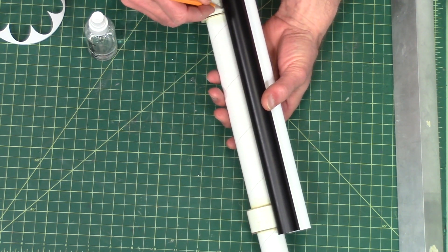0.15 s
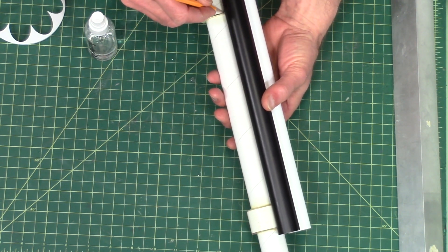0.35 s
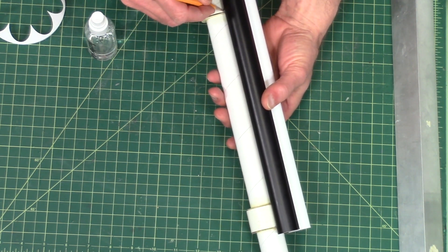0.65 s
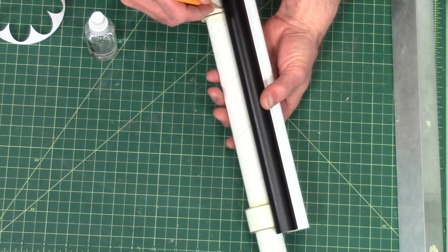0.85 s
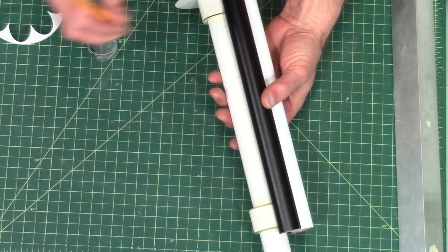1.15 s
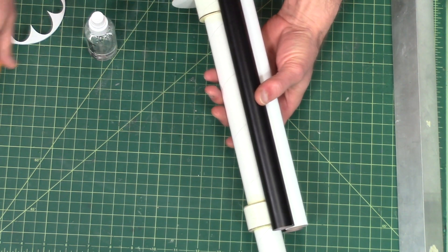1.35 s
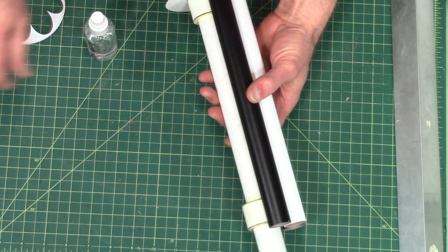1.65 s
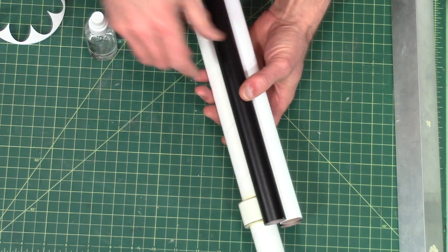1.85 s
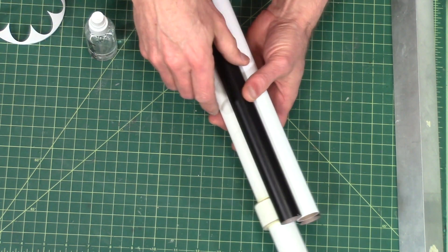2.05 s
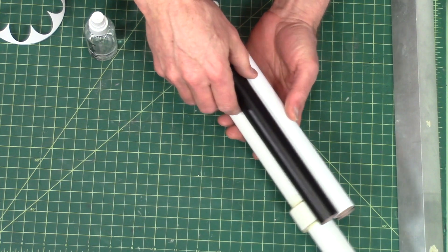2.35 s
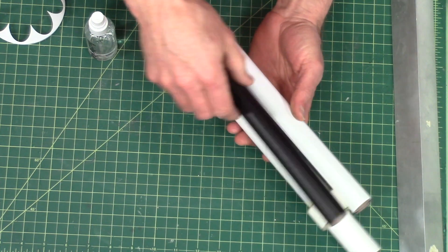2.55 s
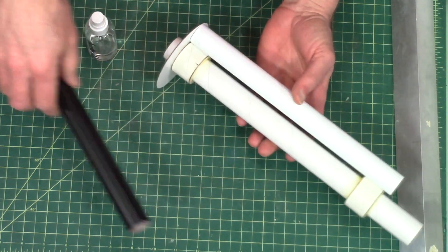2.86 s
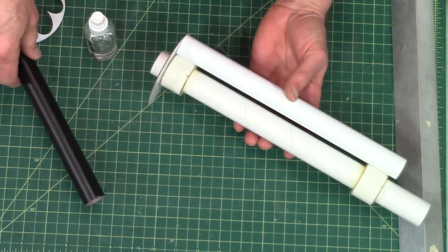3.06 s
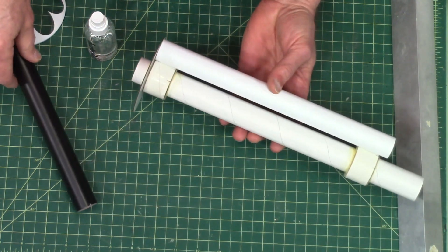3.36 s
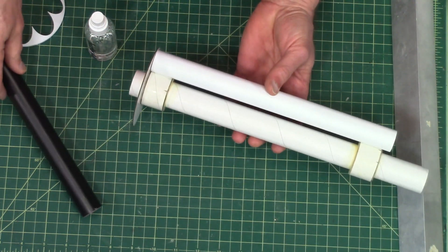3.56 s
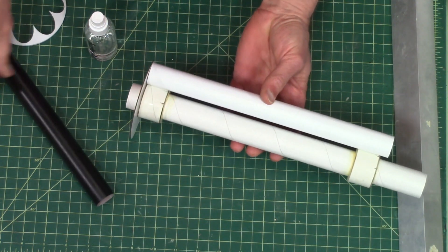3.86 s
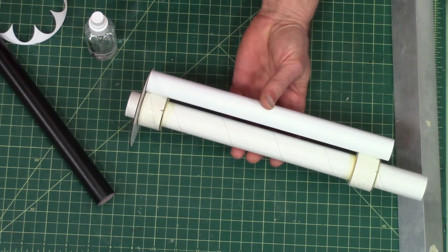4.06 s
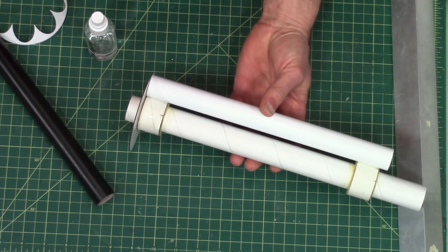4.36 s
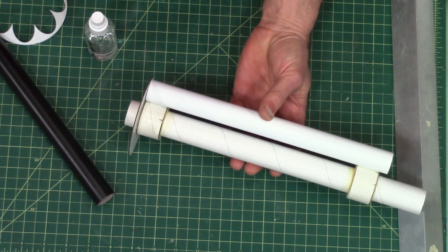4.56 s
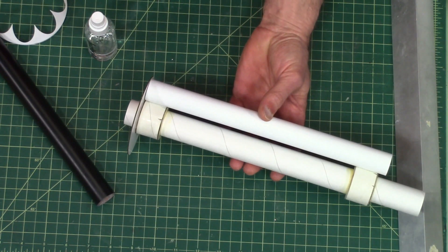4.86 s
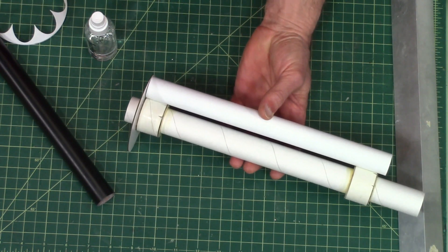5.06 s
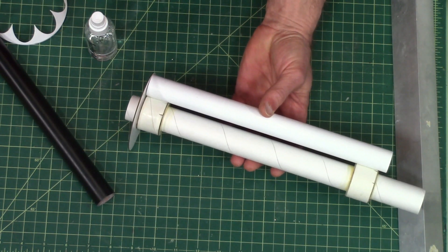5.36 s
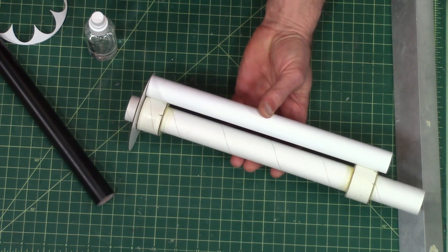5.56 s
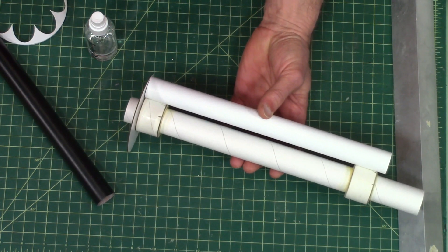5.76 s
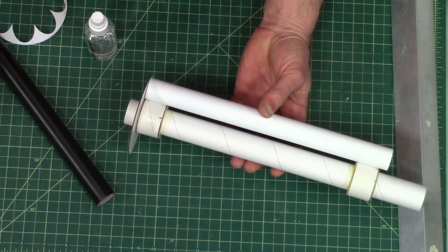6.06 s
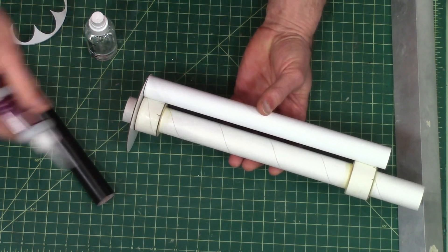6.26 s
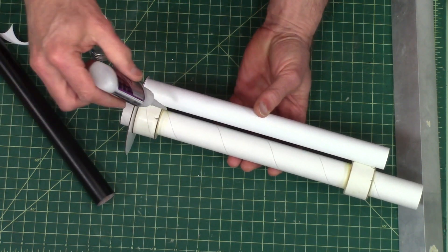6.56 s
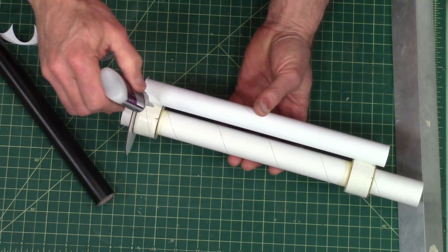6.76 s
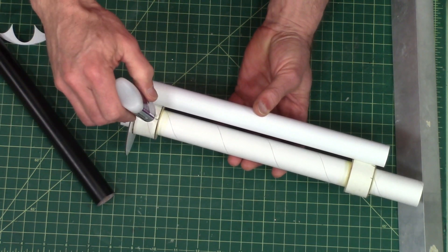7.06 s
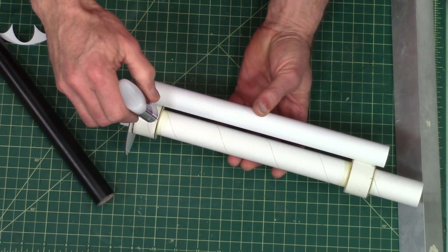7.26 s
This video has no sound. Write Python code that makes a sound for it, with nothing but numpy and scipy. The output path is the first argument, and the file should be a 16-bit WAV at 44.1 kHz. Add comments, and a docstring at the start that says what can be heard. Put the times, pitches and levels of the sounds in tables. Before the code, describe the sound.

A low building rumble and soft microphone hiss run throughout in a small room. During the first second a pencil makes several faint, short scratches on cardboard. At about 1.5 seconds it is put down with a double click, the second brighter. Fingers brush the card at 2 seconds. From 2.4 to 2.7 seconds a loose cardboard tube taps and thumps onto a cutting mat, while a distant engine hum swells, then slowly sinks and fades. The tube is nudged at 3.2 and 3.8 seconds, with light clicks and brief sliding. Faint finger rubs follow. At about 5.1 and 5.2 seconds glued cardboard tubes knock twice on the bench, hollow and slightly ringing, the loudest sounds here. More soft rubbing comes near 5.8 seconds, and a glue bottle makes two light, crunchy taps at about 6.2 and 6.6 seconds.

```python
"""A workbench in a small room, where cardboard tubes are handled over a cutting mat.
A pencil marks a tube and is put down; fingers rub the card; a loose black tube is set down, nudged and
rolls a little; the glued white tubes knock twice on the bench and a glue bottle is brought up to them.
Impact and friction excite the objects and the bench beneath them, and the room reverberates.
Under it all lie the rumble of the building, microphone hiss and the hum of a far engine."""
import sys
import numpy as np
from scipy import signal
from scipy.fft import rfft, irfft, next_fast_len
from scipy.io import wavfile
from scipy.ndimage import uniform_filter1d

SR = 44100
rng = np.random.default_rng(int(sys.argv[2]) if len(sys.argv) > 2 else 0)


def wav_record(signal):
    """Record a signal, one row per channel, as 16-bit PCM in the file named by sys.argv[1]."""
    frames = np.transpose(np.atleast_2d(signal))
    bounded = np.clip(frames, -1, 1)
    # unit amplitude maps onto the largest positive 16-bit level
    quanta = np.round(bounded * 32767).astype(np.int16)
    wavfile.write(sys.argv[1], SR, quanta)


N = 326340
RING = 16384  # samples in which an object rings out
# modes of the glued white tubes: (frequency [Hz], energy re the click [dB], T60 [s])
WHITE_TUBE_MODES = [(686, -10, .22), (783, -13, .1), (1338, -16, .14), (1460, -6, .04), (1576, 0, .07),
                    (1601, -6, .17), (1665, -5, .11), (1705, -13, .12), (1807, -20, .1)]


def undb(db):
    """Decibels to amplitude ratio."""
    return 10 ** (np.asarray(db) / 20)


def unit(x):
    """Normalisation to an energy of one."""
    return x / np.sqrt(np.sum(x ** 2))


def along(points, size):
    """Interpolation of a (frequency [Hz], value) table at FFT bins, on a logarithmic axis."""
    hz, value = np.transpose(points)
    return np.interp(np.log(np.arange(size // 2 + 1) * SR / size + 1), np.log(hz), value)


def tint(x, points):
    """Minimum-phase filter with a (frequency [Hz], gain [dB]) response, built from its cepstrum."""
    size = 2 * next_fast_len(len(x) // 2 + RING // 2)
    cepstrum = irfft(np.log(undb(along(points, size))))
    cepstrum[1:size // 2] *= 2
    cepstrum[size // 2 + 1:] = 0
    return irfft(rfft(x, size) * np.exp(rfft(cepstrum)))[:len(x)]


def add(track, start_s, x):
    """Superposition of x on the track."""
    i = max(int(start_s * SR), 0)
    track[i:i + len(x)] += x[:N - i]


def walk(rate_hz):
    """Slow random modulation with a spread near one."""
    step = int(SR / rate_hz)
    return uniform_filter1d(np.repeat(rng.standard_normal(N // step + 1), step), step)[:N]


def pair_noise(coherence, size):
    """Partial coherence: white noise at two microphones is a common part plus or minus a side part."""
    mid, side = rfft(rng.standard_normal((2, size)))
    alike = np.clip(along(coherence, size), 0, 1)
    mid, side = mid * np.sqrt((1 + alike) / 2), side * np.sqrt((1 - alike) / 2)
    return irfft(np.array([mid + side, mid - side]), size)


def background(sway_db):
    """Spectrally shaped noise: the gently swaying rumble of the building and even microphone hiss."""
    # likeness of the noise at the two microphones: (frequency [Hz], coherence [0-1])
    coherence = [(130, 0.94), (300, 0.24), (700, 0.3), (1200, 0.11)]
    # noise spectra: (frequency [Hz], density [dB per Hz])
    rumble_spectrum = [(15, -84), (28, -73), (36, -70), (48, -82), (68, -76.5), (115, -74), (160, -82),
                       (240, -91.5), (500, -93), (1000, -107), (3000, -130)]
    hiss_spectrum = [(500, -112), (1200, -109), (1600, -102), (2000, -99), (2400, -103.5), (3100, -108),
                     (4200, -105.3), (6200, -102.3), (9000, -105), (12000, -110.5), (15500, -114.5)]
    rumble, hiss = (irfft(rfft(pair_noise(coherence, N)) * undb(along(spectrum, N)), N)
                    for spectrum in (rumble_spectrum, hiss_spectrum))
    return (rumble * undb(sway_db * walk(3.2)) + hiss) * np.sqrt(SR / 2)


def far_engine(waver_db, drift):
    """Wall transmission passes only an engine's lowest note; it swells, then fades and sinks to idle."""
    peak_s, peak_db, rise_db_per_s, fade_db_per_s = 2.8, -48, 37, 4
    high_hz, idle_hz, sink_s = 109, 95.2, 0.93
    t = np.arange(N) / SR
    before, after = np.maximum(peak_s - t, 0), np.maximum(t - peak_s, 0)
    hz = idle_hz + (high_hz - idle_hz) * np.exp(-after / sink_s)
    db = peak_db - rise_db_per_s * before - fade_db_per_s * after
    phase = 2 * np.pi * np.cumsum(hz * (1 + drift * walk(9))) / SR
    return np.sqrt(2) * np.sin(phase) * undb(db + waver_db * walk(7))


def body(click, modes):
    """Impulse response of an object, in two parts: the contact click and a sum of damped modes."""
    t = np.arange(RING) / SR
    ring = sum(undb(db) * unit(np.sin(2 * np.pi * hz * t) * np.exp(-np.log(1000) * t / t60))
               for hz, db, t60 in modes)
    return unit(tint(1. * (t == 0), click)), ring


def bench_thumps():
    """Contact stiffness colours the bench's thump: deep through the soft mat, higher under stiff tubes."""
    # spectrum of the struck bench: (frequency [Hz], level [dB])
    thud = [(30, -45), (60, -23), (120, -16.5), (190, 5), (400, 7), (560, -14), (720, -3.5), (1050, -15.5),
            (2000, -47), (6000, -40)]
    # bench modes: (frequency [Hz], energy re the thud [dB], T60 [s])
    modes = [(204, -18, .8), (224, -20.5, .7), (310, -27, .7), (366, -17, .3), (419, -16, .25),
             (466, -10, .22), (582, -17, .18), (640, -14, .18)]
    # colour of each contact: (frequency [Hz], gain [dB])
    soft_contact = [(160, -3), (235, 4.5), (320, -10), (430, 1), (750, 0)]
    stiff_contact = [(160, 1), (240, -4), (320, -7), (450, 1), (720, 4), (1100, -1.5)]
    thump = unit(sum(body(thud, modes)))
    return tint(thump, soft_contact), tint(thump, stiff_contact)


def excite(force, response, treble_db, ring_db):
    """Forced vibration by convolution: harder contact lifts the treble, a grip weakens the modes."""
    click, ring = response
    vibration = signal.fftconvolve(force, click + undb(ring_db) * ring)[:RING]
    return unit(tint(vibration, [(1900, 0), (8000, treble_db)]))


def rubs(table, response, bench, slips_per_s, grain_db, thump_db):
    """Stick-slip friction: a swell of small, uneven slips rings the object and rumbles in the bench."""
    lightness = 0.88  # a light, bright rub shakes the bench less: dB lost per dB of treble
    out, t = np.zeros(N), np.arange(RING) / SR
    for start_s, length_s, db, treble_db, ring_db in table:
        slips = (rng.random(RING) < slips_per_s / SR) * rng.standard_normal(RING)
        slips *= undb(grain_db * rng.exponential(size=RING))
        force = slips * np.sin(np.pi * np.minimum(t / length_s, 1) ** 0.45)
        rumble = undb(thump_db - lightness * treble_db) * unit(signal.fftconvolve(force, bench)[:RING])
        scrape = excite(force, response, treble_db, ring_db)
        add(out, start_s, undb(db) * (scrape + rumble) * np.sqrt(length_s * SR))
    return out


def pencil_strokes(bench):
    """Friction of lead on cardboard: dense, fine slips excite heavily damped high modes."""
    # strokes: (time [s], duration [s], level [dB])
    strokes = [(0.097, 0.096, -59), (0.244, 0.14, -61.5), (0.43, 0.017, -52.5), (0.533, .07, -64.5),
               (0.657, 0.07, -63), (0.794, 0.028, -62), (0.851, 0.08, -60.5), (0.933, 0.02, -53)]
    # spectrum of one slip: (frequency [Hz], level [dB])
    scratch = [(300, -26), (2800, -6), (4100, -31), (5000, 0), (6200, 0.5), (9000, 6.5), (12000, -5),
               (15000, -32)]
    # modes of the lead: (frequency [Hz], energy re the slip [dB], T60 [s])
    modes = [(3750, -6, .015), (4150, -7, .012), (9000, -10, .01)]
    treble_db, ring_db = 1, -8  # all strokes are pressed alike
    strokes = [(*stroke, treble_db, ring_db) for stroke in strokes]
    return rubs(strokes, body(scratch, modes), bench, slips_per_s=6000, grain_db=0.5, thump_db=-27)


def blows(table, response, bench, crunch, crunch_s, direct_db, rebound=None):
    """Impact rings the object and thumps the bench; returns the feeds to the room and the direct path.
    A long, loose object lands one end first, then rebounds: (lag [s], level, treble, direct path [dB])."""
    out, t = np.zeros((2, N)), np.arange(RING) / SR
    contacts = [(0, 0, 0, 0)] + ([rebound] if rebound else [])
    for start_s, db, thump_db, treble_db, ring_db in table:
        for lag_s, more_db, more_treble_db, more_direct_db in contacts:
            # the rough surfaces give way in tiny slips just after they meet
            slips = unit(rng.standard_normal(RING) ** 3 * np.exp(-t / crunch_s))
            force = (t == 0) + crunch * slips
            knock = undb(db) * excite(force, response, treble_db + more_treble_db, ring_db)
            blow = undb(more_db) * (knock + undb(thump_db) * bench)
            add(out[0], start_s + lag_s, blow)
            add(out[1], start_s + lag_s, blow * undb(direct_db + more_direct_db))
    return out


def pencil_put_down(bench):
    """Double impact of a rod: one end lands, and the other follows with a brighter click."""
    # impacts: (time [s], level [dB], bench thump [dB], treble [dB], ringing [dB])
    impacts = [(1.521, -19, -23.5, -7.5, -22), (1.6013, -2.5, -23.5, 10, -8)]
    # contact spectrum: (frequency [Hz], level [dB])
    click = [(300, 4), (1100, -14), (1800, 7), (3000, -4.5), (4500, -5.5), (6200, -0.5), (8500, -4.5),
             (11000, -8.5), (15000, -39)]
    # pencil modes: (frequency [Hz], energy re the click [dB], T60 [s])
    modes = [(1600, -18, .02), (3400, -18, .02), (6150, -8, .03)]
    return blows(impacts, body(click, modes), bench, crunch=3.6, crunch_s=0.0017, direct_db=2.5,
                 rebound=(0.0045, -3.5, 10, 13))


def finger_rubs(bench):
    """Friction of skin on cardboard: coarse slips excite the modes of the white tubes."""
    # rubs: (time [s], duration [s], level [dB], treble [dB], ringing [dB])
    touches = [(2.03, 0.19, -59, 12, -6.5), (4.32, 0.12, -62, 10, -6), (4.86, .11, -63.5, 2.5, -4.5),
               (5.755, 0.069, -53.5, 9.5, -6.5), (5.9, 0.13, -54, 18.5, -5.5), (6.21, 0.22, -64, 7, -16)]
    # spectrum of one slip: (frequency [Hz], level [dB])
    skin = [(300, -37), (1000, -4), (1650, -6), (3000, -1.5), (4200, -5.5), (6000, -0.5), (9500, -1.5),
            (12000, -11), (15000, -12)]
    return rubs(touches, body(skin, WHITE_TUBE_MODES), bench, slips_per_s=3000, grain_db=4.5, thump_db=-2)


def black_tube(bench):
    """Impact and sliding friction excite the same modes of a loose tube in different proportions."""
    # impacts: (time [s], level [dB], bench thump [dB], treble [dB], ringing [dB])
    impacts = [(2.407, -17.5, -32.5, 7.5, -26), (2.573, -28.5, -32.5, 5.5, -18),
               (2.6695, -7.5, -9, -8, -47), (3.200, -18.5, -42, 13.5, -22), (3.2255, -6, -15, 8, -9),
               (3.833, -11, -17, 15.5, -7), (4.070, -39.5, -49, -10, -17)]
    # slides: (time [s], duration [s], level [dB], treble [dB], ringing [dB])
    slides = [(3.233, 0.007, -28, 13.5, -16), (3.44, 0.0057, -42.5, 13, 3.5), (3.599, 0.061, -57, 6, -13),
              (3.838, 0.091, -42, 10, -4)]
    # contact spectrum: (frequency [Hz], level [dB])
    contact = [(300, -1), (1100, -7.5), (2000, 3.5), (2900, -5), (3400, -8.5), (4100, -4), (4900, -7),
               (6000, -6), (9000, -6), (12000, -18.5), (15000, -44)]
    # tube modes: (frequency [Hz], energy re the click [dB], T60 [s])
    modes = [(1890, -18, .06), (2245, -7, .14), (3980, -8, .035), (4130, -13, .04), (4720, -19, .07),
             (5450, -16, .05), (5800, -11, .045), (6030, -14, .045), (7120, -17, .07), (9200, -16, .03)]
    # sliding on its side hardly stirs the 4 kHz modes: (frequency [Hz], gain [dB])
    slide_coupling = [(1900, -4), (2250, 5), (3400, -10), (4100, -16), (4700, 3.5), (5800, -2), (7100, 2),
                      (9200, 2)]
    click, ring = body(contact, modes)
    knocks = blows(impacts, (click, ring), bench, crunch=2.1, crunch_s=0.0027, direct_db=6.5,
                   rebound=(0.006, -0.83, 0.85, 6.5))
    sliding = click, tint(ring, slide_coupling)
    return knocks + rubs(slides, sliding, bench, slips_per_s=2500, grain_db=-2, thump_db=-4)


def white_tubes(bench):
    """Impulsive excitation: the stiff glued tubes strike cleanly and ring at their natural frequencies."""
    # impacts: (time [s], level [dB], bench thump [dB], treble [dB], ringing [dB])
    impacts = [(5.094, -28.5, -22.5, 4, -1), (5.1178, 0.5, 3, -8, -15.5), (5.164, -6, -11.5, 3, -12),
               (5.2124, 8.5, 1, 12.5, -0.5), (5.2472, -7, -4, 2, -25)]
    # contact spectrum: (frequency [Hz], level [dB])
    click = [(300, -21), (800, -8), (1050, -2), (1550, 19.5), (2200, 6), (2900, -1), (5000, -3), (7000, 3),
             (8700, 4.5), (11500, -5.5), (15000, -29)]
    return blows(impacts, body(click, WHITE_TUBE_MODES), bench, crunch=0.03, crunch_s=0.0016, direct_db=6.5)


def glue_bottle(bench):
    """Non-resonant impact: the bottle gives a crunchy click and a thump, with no modes of its own."""
    # impacts: (time [s], level [dB], bench thump [dB], treble [dB], ringing [dB, no effect])
    impacts = [(6.205, -29.5, -25.5, -6, 0), (6.5595, -19, -20, -10, 0)]
    # contact spectrum: (frequency [Hz], level [dB])
    click = [(300, -5), (650, 2), (1000, -7), (1500, 3), (3000, -2.5), (6000, 2), (10000, 5), (15000, -25)]
    return blows(impacts, body(click, []), bench, crunch=2.4, crunch_s=0.006, direct_db=7.5)


def room(sent, straight, direct_db, tail_db, onset_s, build_s, right_lag_s):
    """Reverberation: direct sound, early reflections and a diffuse tail that lasts longest in the bass."""
    # reverberation time: (frequency [Hz], T60 [s])
    decay_times = [(120, 0.43), (350, 0.43), (700, 0.27), (1500, 0.25), (5000, 0.22), (11000, 0.16)]
    # reflections from near surfaces: (delay [s], level [dB], lag on the right [s])
    reflections = [(.0044, -19, .00009), (.0054, -9, -.00012), (0.0096, -24.5, .0002),
                   (0.0162, -8.5, -0.011)]
    # likeness of the tail at the two microphones: (frequency [Hz], coherence [0-1])
    coherence = [(200, 1), (700, 0.88), (1500, 0.12), (3000, 0.033)]
    # microphone balance: (frequency [Hz], left minus right [dB])
    balance = [(900, 0.6), (2000, -3), (4000, -1.5), (6200, -4), (8000, 2.8), (11000, 7.3), (15000, 6.8)]
    size = 2 * RING
    t, hz = np.arange(size) / SR, np.arange(size // 2 + 1) * SR / size

    def arrival(delay_s, lag_s):
        """Delay as linear phase: an impulse at each microphone, the right one lagging by lag_s."""
        return irfft(np.exp(-2j * np.pi * hz * np.array([[delay_s], [delay_s + lag_s]])))

    noise, t60 = rfft(pair_noise(coherence, size)), along(decay_times, size)
    half_octave = np.floor(2 * np.log2(np.maximum(hz, 100)))
    build_up = np.clip((t - onset_s) / build_s, 0, 1)
    tail = 0
    for index in np.unique(half_octave):
        band = half_octave == index
        envelope = build_up * np.exp(-np.log(1000) * t / t60[band].mean())
        tail = tail + unit(irfft(noise * band) * envelope) * np.sqrt(2 * np.mean(band))
    echoes = undb(tail_db) * tail + sum(undb(db) * arrival(s, lag) for s, db, lag in reflections)
    direct = undb(direct_db) * arrival(0, round(right_lag_s * SR) / SR)
    sent = tint(sent, [(6000, 1.38), (14000, -13.0)])  # walls and clutter swallow the highest treble
    reverberant = signal.fftconvolve(sent[None], echoes[:, :RING + RING // 2])[:, :N]
    left, right = reverberant + signal.fftconvolve(straight[None], direct[:, :RING])[:, :N]
    return np.array([tint(left, [(f, db / 2) for f, db in balance]),
                     tint(right, [(f, -db / 2) for f, db in balance])])


def scene():
    """Superposition: all handling sounds share the bench and the room, over the noise and the engine."""
    ambience = background(sway_db=2.0) + far_engine(waver_db=1.5, drift=0.0073)
    soft, stiff = bench_thumps()
    sent, straight = (pencil_strokes(soft) + pencil_put_down(soft) + finger_rubs(soft)
                      + black_tube(soft) + white_tubes(stiff) + glue_bottle(soft))
    return ambience + room(sent, straight, direct_db=-10, tail_db=-0.5,
                           onset_s=0.00065, build_s=0.0004, right_lag_s=0.00003)


def record(dry):
    """Band-stop and low-pass filtering: the recorder has two deep, narrow notches and cuts the top."""
    # notches, each applied twice: (frequency [Hz], width of one pass [Hz])
    notches = [(2630, 330), (7700, 640)]
    top_hz = 15750
    for hz, width_hz in notches:
        notch = signal.iirnotch(hz, hz / width_hz, fs=SR)
        dry = signal.lfilter(*notch, signal.lfilter(*notch, dry))
    return signal.sosfilt(signal.ellip(8, .2, 70, top_hz, fs=SR, output="sos"), dry)


dry = scene()
out = record(dry)
wav_record(out)
```